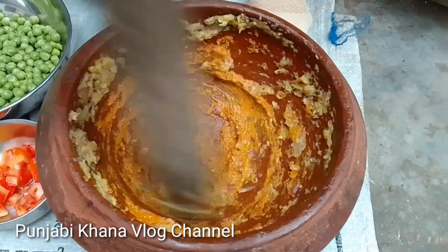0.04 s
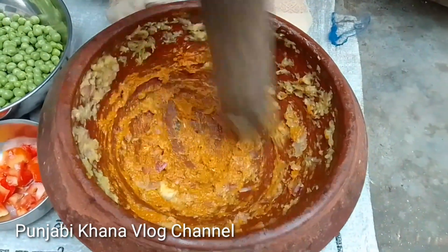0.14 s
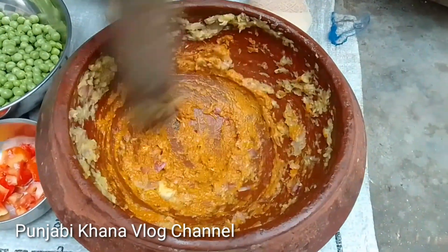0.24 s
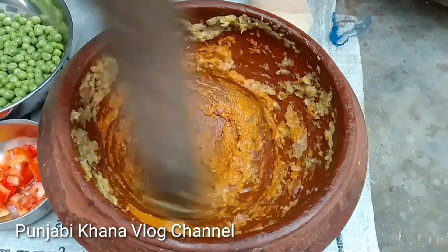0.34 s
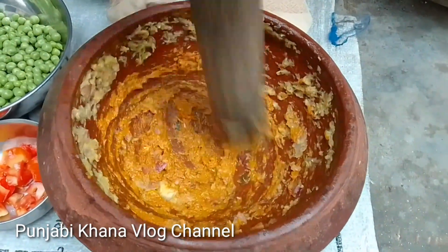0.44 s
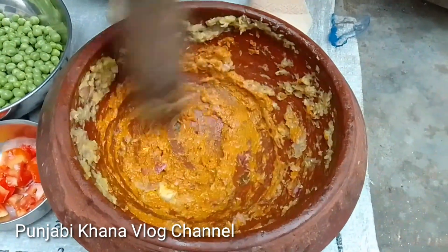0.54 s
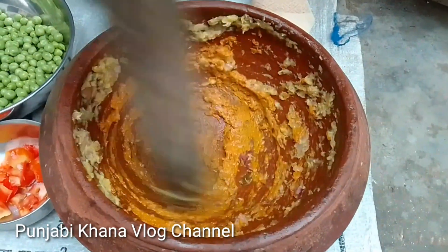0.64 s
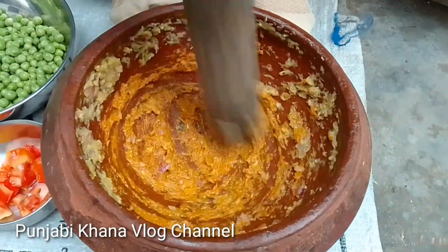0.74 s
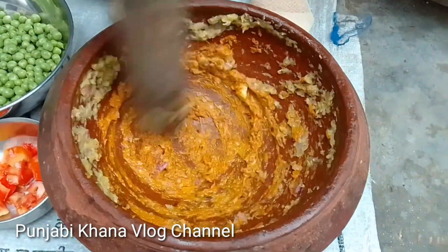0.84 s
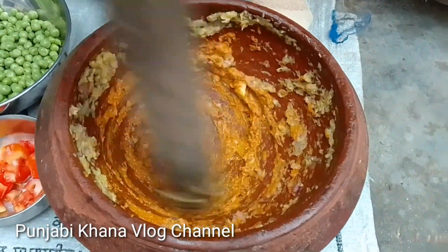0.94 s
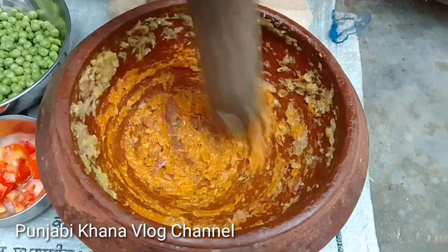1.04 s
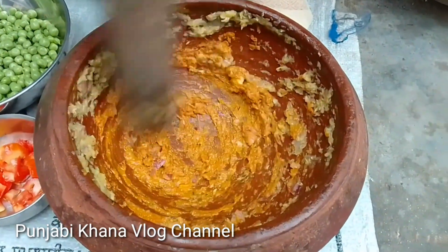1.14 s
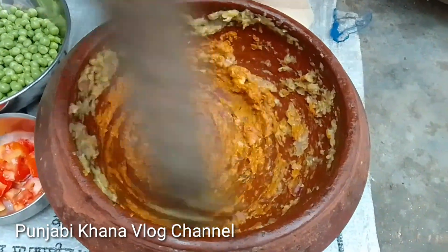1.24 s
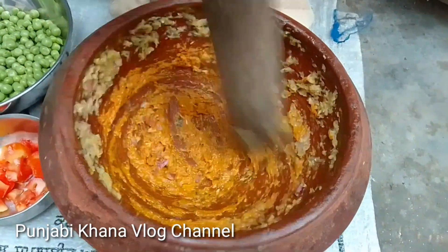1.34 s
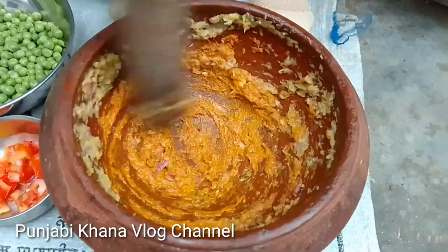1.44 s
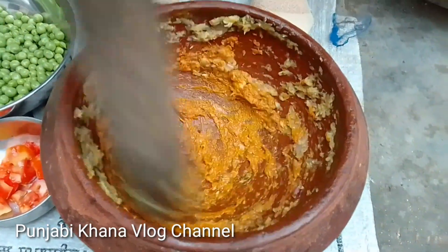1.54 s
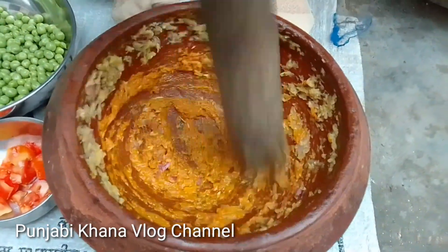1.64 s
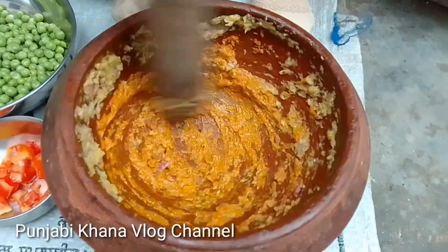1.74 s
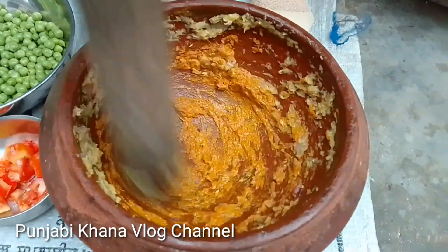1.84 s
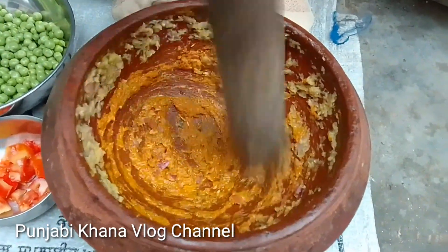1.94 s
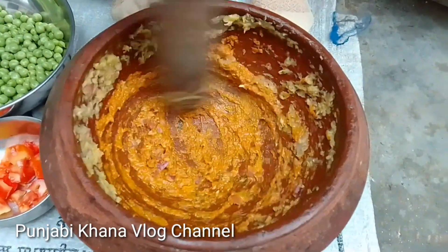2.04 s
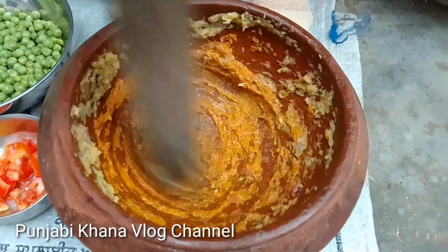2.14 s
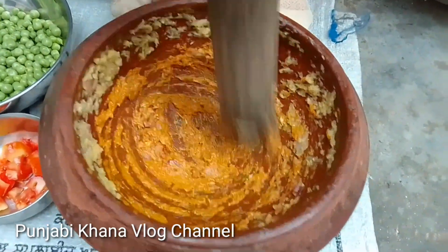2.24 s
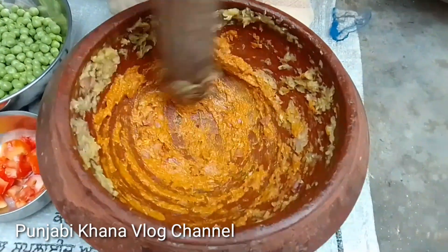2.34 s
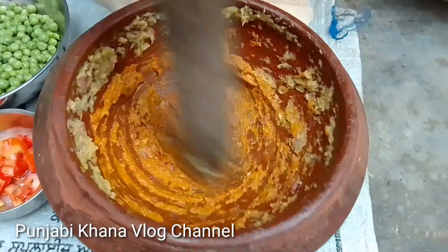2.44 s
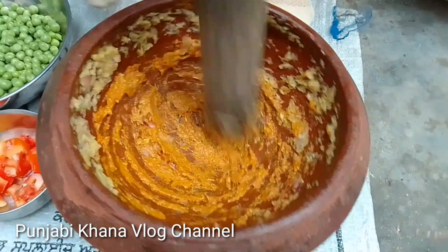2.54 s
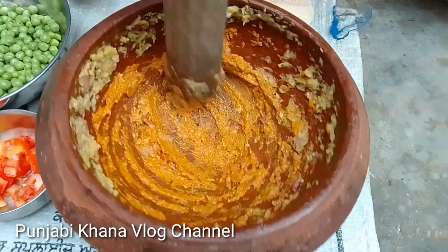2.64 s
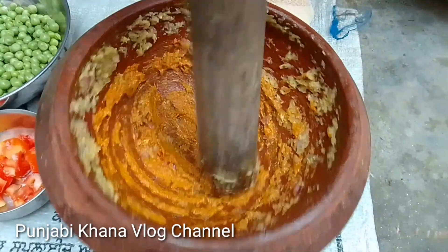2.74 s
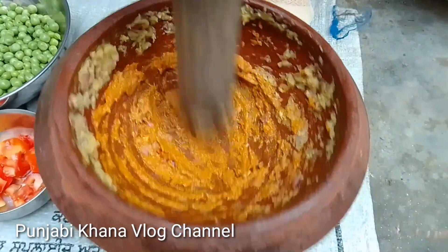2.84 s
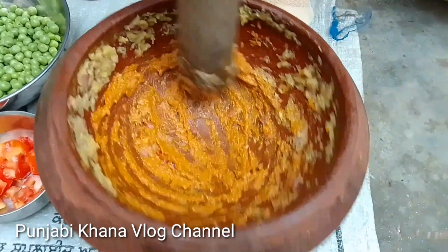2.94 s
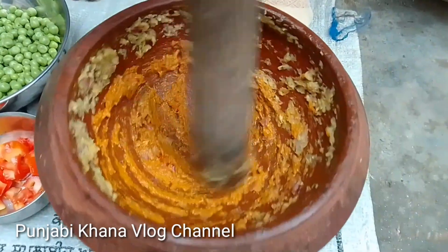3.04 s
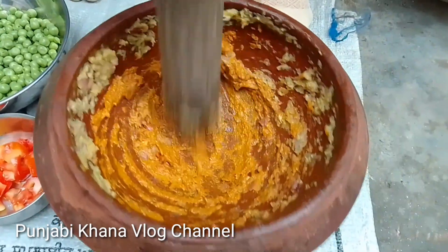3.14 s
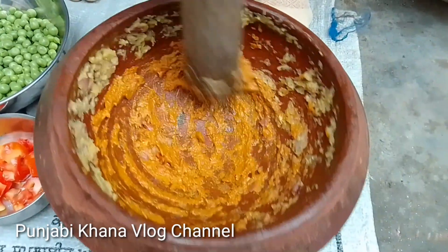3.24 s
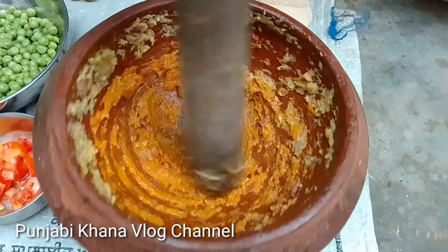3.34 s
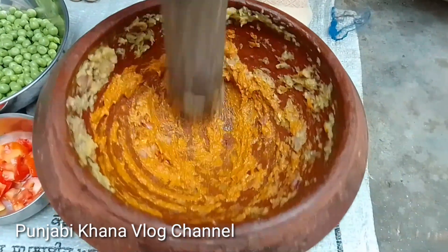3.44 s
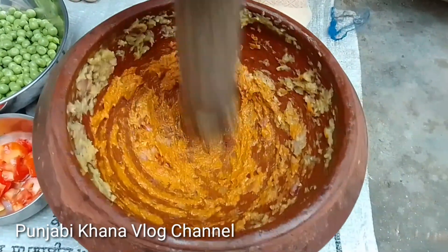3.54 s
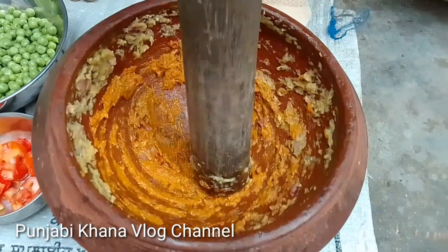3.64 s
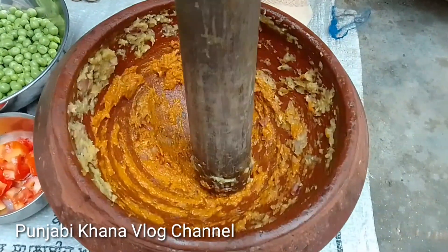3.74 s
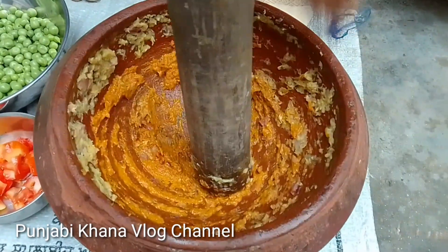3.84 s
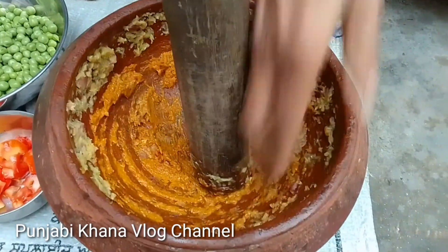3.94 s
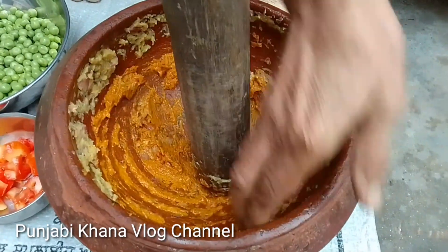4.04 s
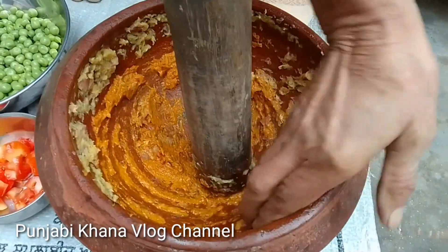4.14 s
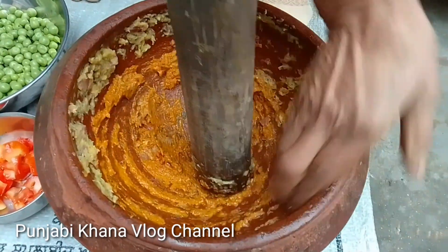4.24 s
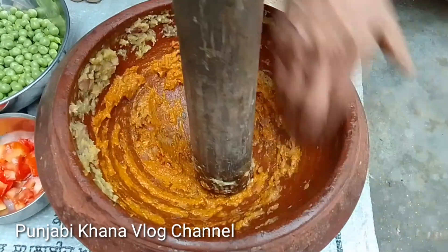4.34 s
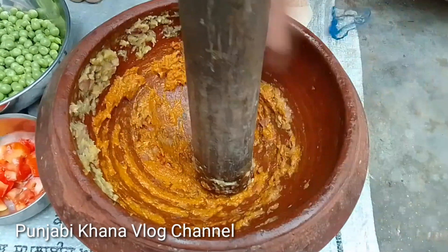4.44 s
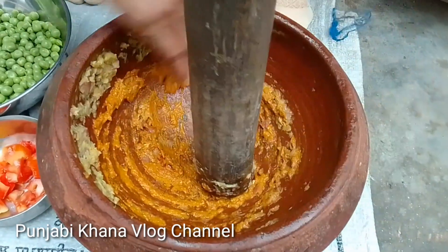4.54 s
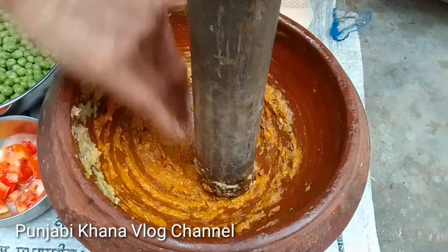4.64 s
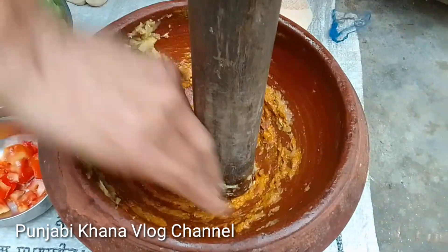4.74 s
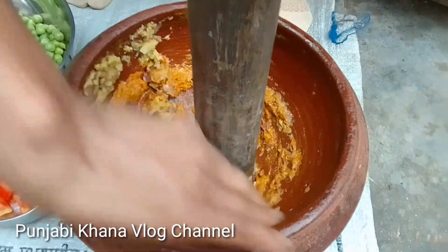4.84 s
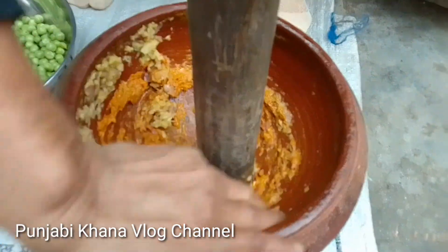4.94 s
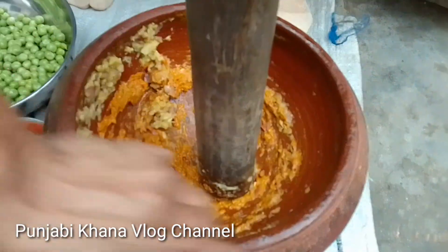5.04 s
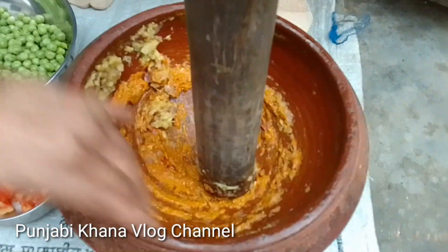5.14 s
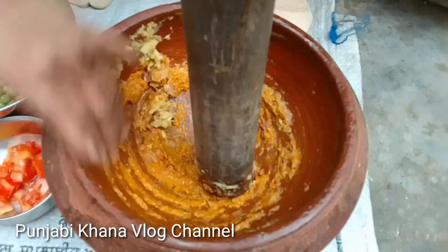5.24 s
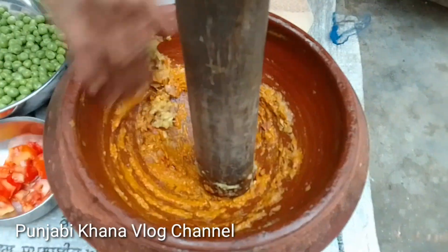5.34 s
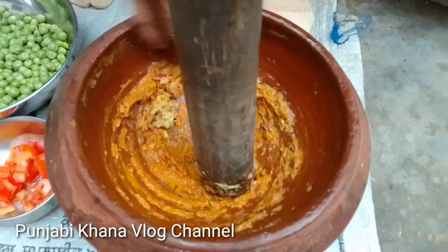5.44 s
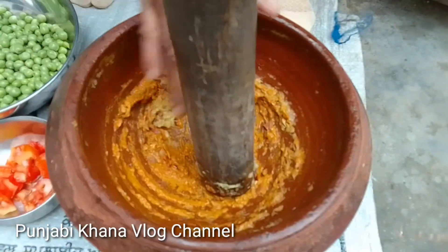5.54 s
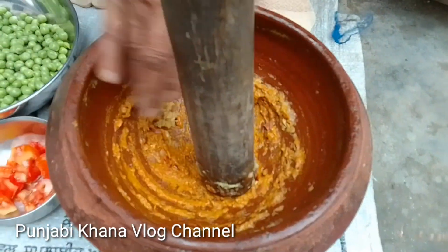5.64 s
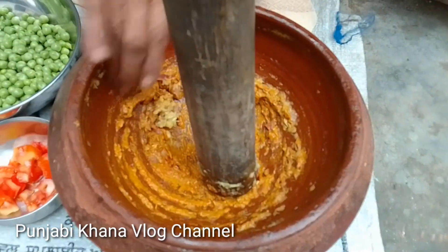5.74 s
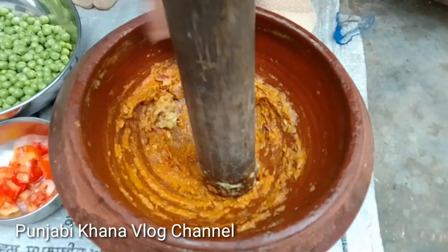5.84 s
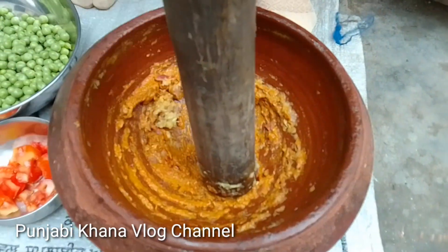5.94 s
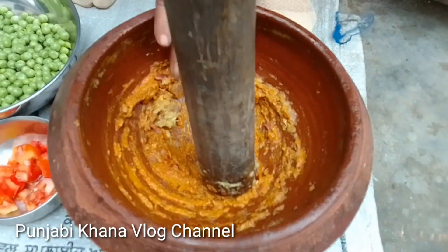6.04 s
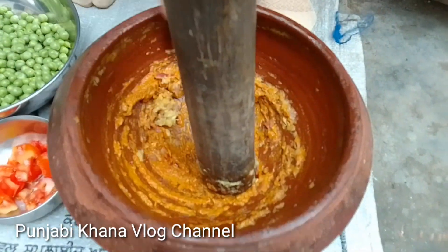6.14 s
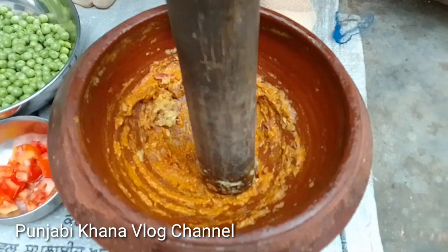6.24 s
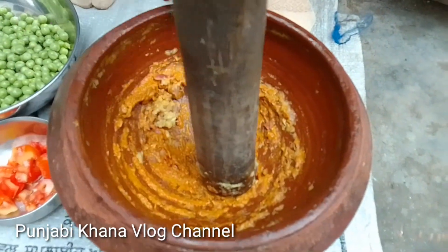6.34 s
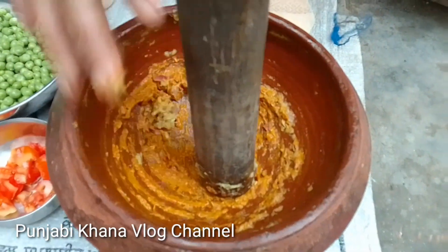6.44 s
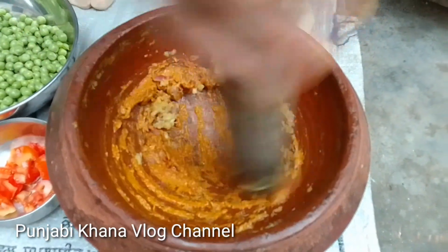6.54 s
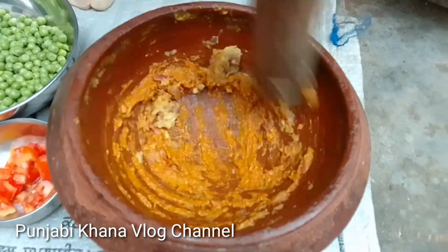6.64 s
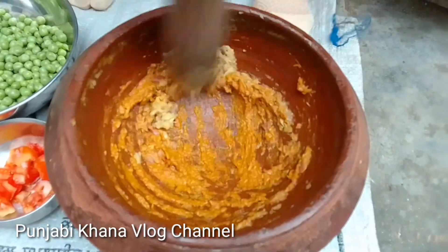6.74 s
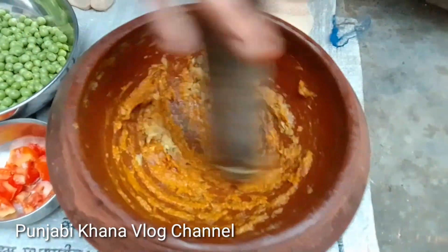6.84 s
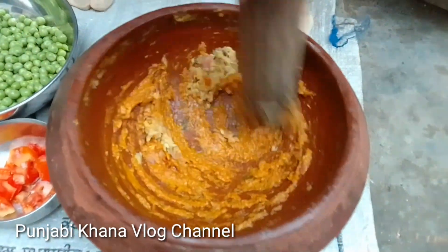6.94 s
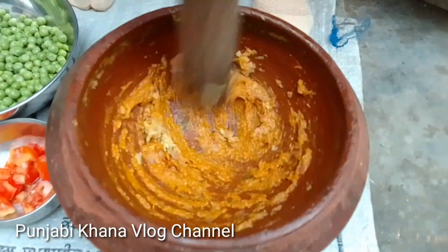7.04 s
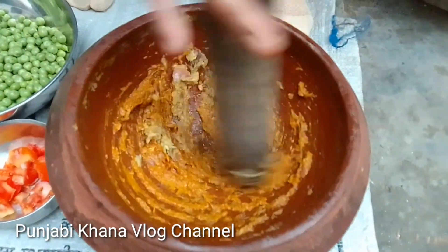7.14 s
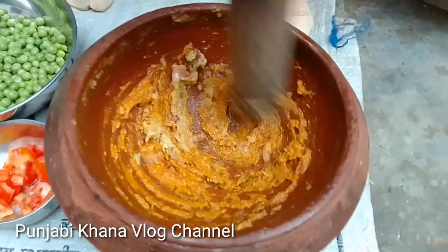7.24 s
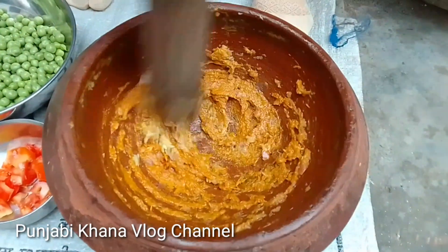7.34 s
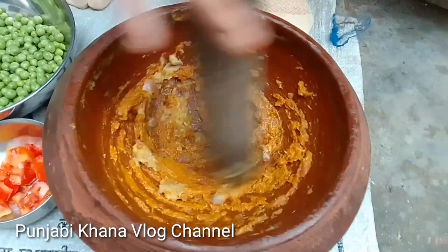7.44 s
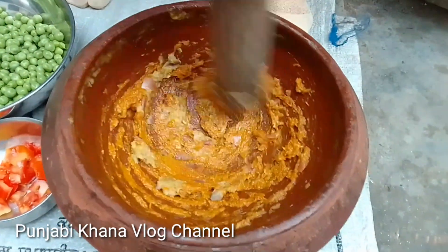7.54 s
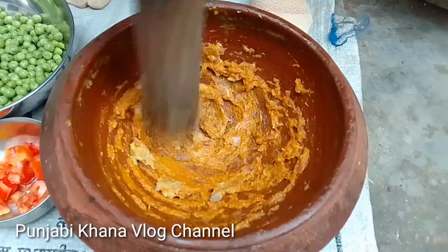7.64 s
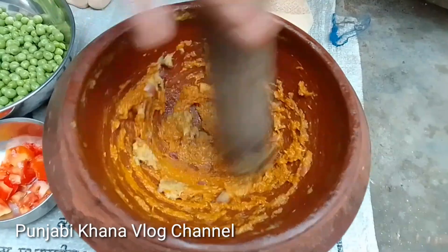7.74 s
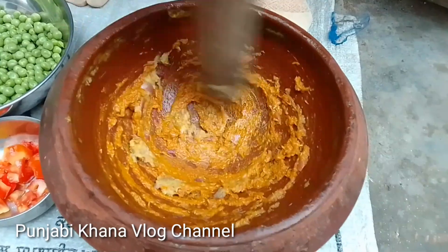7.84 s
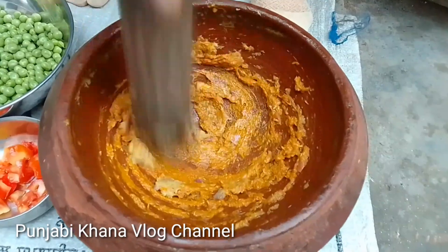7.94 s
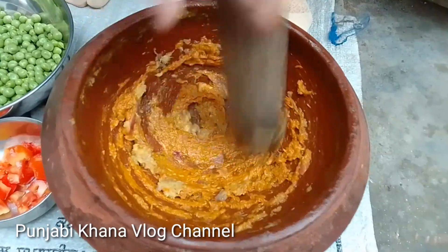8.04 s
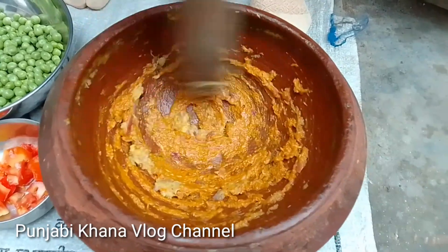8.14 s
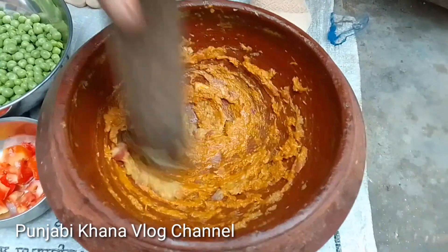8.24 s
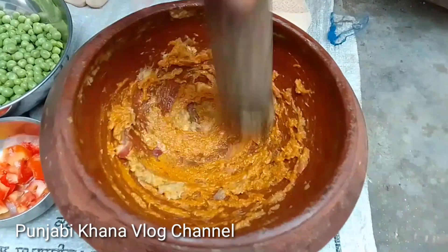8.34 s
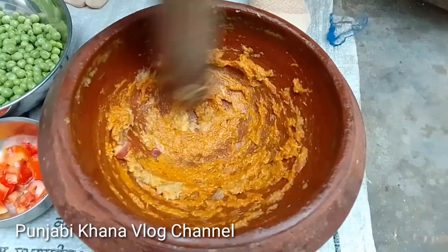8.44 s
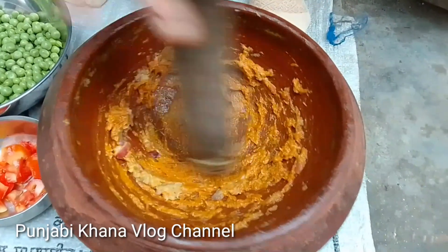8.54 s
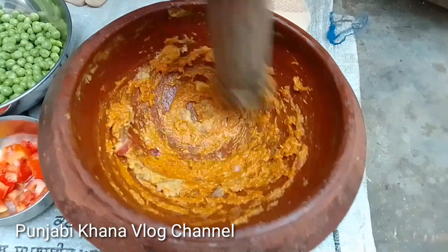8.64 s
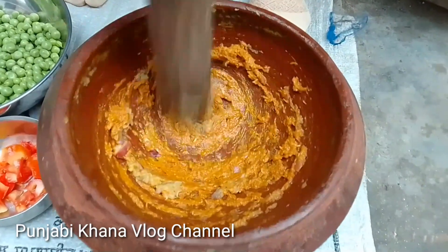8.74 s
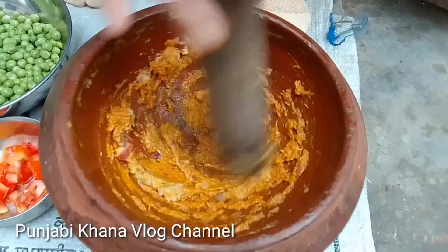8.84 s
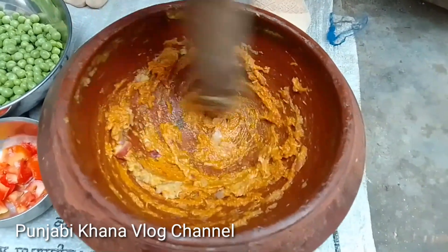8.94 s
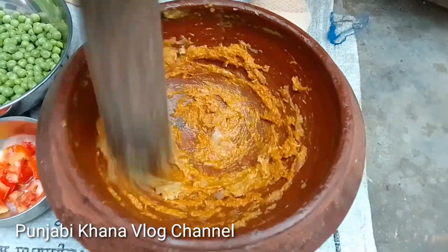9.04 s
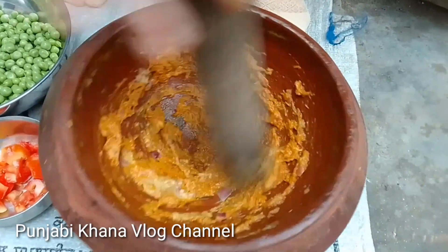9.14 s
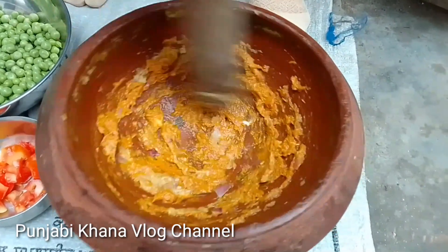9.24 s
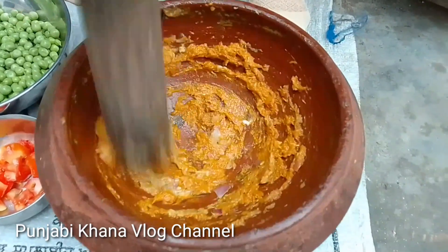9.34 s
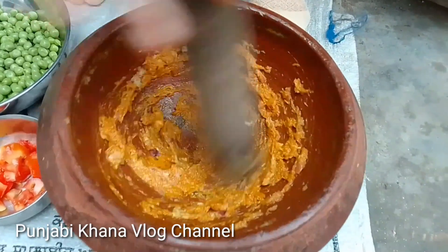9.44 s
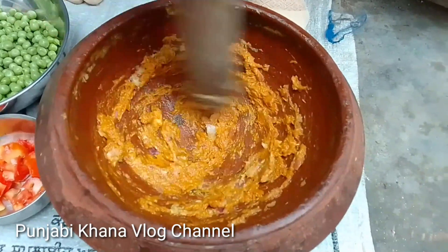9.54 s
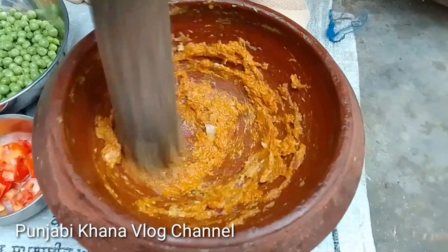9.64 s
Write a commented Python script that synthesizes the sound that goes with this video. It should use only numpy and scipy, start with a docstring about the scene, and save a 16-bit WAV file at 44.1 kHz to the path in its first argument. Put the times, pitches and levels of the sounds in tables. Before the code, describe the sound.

Close to the microphone, a wooden pestle drags through wet, gritty spice paste in a clay mortar, with irregular dull knocks, sharp snaps and tiny wet squeaks. It stops, and a hand softly wipes and taps the clay wall, hissing faintly. Then the grinding returns with harder knocks and continues to the end. A quiet, low rush of kitchen air stays underneath.

```python
"""A wooden pestle drags and knocks through wet, gritty spice paste in a clay mortar for 3.7 seconds.
It settles softly, then a hand wipes and taps the wall: skin hisses and the clay faintly sings.
From about 6.6 seconds the pestle is back until the end. Its uneven contact shakes wood, clay and paste,
blows thud and ring, and the mix snaps. Filtered noise makes the quiet rush of a kitchen throughout."""
import sys
import numpy as np
from scipy import signal
from scipy.io import wavfile
from scipy.ndimage import uniform_filter1d

SR = 44100
rng = np.random.default_rng(int(sys.argv[2]) if len(sys.argv) > 2 else 0)


def wav_out(sig):
    """Save sig, one row per channel (or a flat mono array), as 16-bit PCM at SR to the path in sys.argv[1]."""
    wavfile.write(sys.argv[1], SR, np.round(np.clip(np.atleast_2d(sig).T, -1, 1) * 32767).astype(np.int16))


N = 427324

# Low rush of air in the kitchen. Each row: frequency in Hz, relative level in dB per Hz.
AIR_SPECTRUM = [(25, -5), (70, -12.5), (140, 2.5), (300, -3), (520, -10.5), (950, -31), (2800, -35.5),
                (16000, -42.5)]
# Higher band of kitchen noise that comes and goes. Each row: time in seconds, level in dB.
MURMUR_LEVEL = [(3.8, -63.5), (4.25, -75), (4.5, -65), (5.2, -70), (5.7, -83), (6.1, -99.5), (6.25, -63),
                (6.7, -76)]
# Soft rubs on clay: the pestle settling first, then strokes of the hand along the wall.
# Each row: start in seconds, length in seconds, base level in dB, rise in dB per second,
# clay in dB above the base, hiss outside 5.9-9.5 kHz in dB above the base, pitch that sings in Hz.
SOFT_RUBS = [(3.764, 0.18, -75, 449, 7.5, 11.5, 2840), (4.028, 0.083, -75, 450, -5.5, 7, 2840),
             (4.395, .26, -52, 222, -4, 4, 1700), (4.66, 0.15, -61.5, 455, -14, -3, 1700),
             (4.783, 0.15, -61, 601, -9, 4, 1700), (5.096, 0.18, -71, 202, -8, 3.5, 990),
             (5.257, 0.3, -52, 453, -13, -11.5, 2162), (5.678, 0.24, -93.5, 201, 16, -3, 1300),
             (5.86, 0.14, -75.5, 200, 2.5, 3.5, 990), (6.176, 0.072, -65, 900.5, -11, 4, 990),
             (6.22, 0.19, -61.5, 252.5, -14, 1.5, 2162)]
# Hiss of skin on damp clay. Each row: frequency in Hz, relative level in dB per Hz.
SKIN_SPECTRUM = [(1760, -94), (3000, -16.5), (3810, -2.5), (4350, -6.5), (8520, 10), (9730, -3),
                 (12400, -4), (15100, -11), (16000, 1.5)]
# Resonances of the thin clay near the lip. Each row: pitch in Hz, width in Hz, relative level in dB.
WALL_MODES = [(990, 73, 0.5), (1300, 69, 6), (1200, 620, -6), (1700, 166, -4.5), (2162, 72, -2.5),
              (2840, 73, -23), (3380, 82, -12.5)]
# A finger taps the wall. Each row: time in seconds, level in dB.
FINGER_TAPS = [(4.782, -42), (5.793, -56.5), (6.155, -55)]
# Grit cracks or paste smacks. Each row: time in seconds, peak level in dB.
SNAP_TIMES = [(0.5276, -15.5), (1.159, -15), (1.4437, -11), (1.48, -19.5), (1.738, -16.5), (1.7723, -12.5),
              (2.0386, -14), (2.2896, -14.5), (2.3556, -13.5), (2.514, -18), (2.787, -16), (2.816, -19),
              (2.8312, -14), (2.9184, -15.5), (3.48, -21), (6.902, -13.5), (7.7408, -19), (7.783, -12.5),
              (7.8912, -16), (8.0726, -14.5), (8.121, -15), (8.212, -23), (8.402, -13.5), (8.6085, -16),
              (9.257, -14.5), (9.38, -17), (9.656, -15)]
# Fizz of the paste. Each row: frequency in Hz, relative level in dB per Hz.
FIZZ_SPECTRUM = [(2710, -17.5), (4600, -6.5), (4870, -8.5), (8420, -2), (9800, -8.5), (12200, -9),
                 (14900, -16), (16000, -11.5)]
# Resonances of the wooden pestle. Each row: pitch in Hz, width in Hz, relative level in dB.
PESTLE_MODES = [(148, 39, -10), (227, 47, 6), (330, 77, -4), (527, 130, 3.5), (578, 110, 7),
                (790, 110, -11)]
# Resonances of the clay bowl. Each row: pitch in Hz, width in Hz, relative level in dB.
MORTAR_MODES = [(935, 29, 3), (1091.6, 92, 3.5), (1201, 170, 0), (1460, 170, -11.5), (1696, 99, 6.5),
                (1920, 640, -11.5), (2183, 59, -2.5), (2364, 118, -3)]
# Higher resonances of the rim. Each row: pitch in Hz, width in Hz, relative level in dB.
RIM_MODES = [(3184, 280, 0), (3750, 240, -6.5), (3890, 170, 2), (4453, 260, -3.5), (6520, 680, -3)]
# Strokes of the pestle through the paste. Each row: start in seconds, length in seconds,
# scrape of wood on clay in dB and fizz of paste in dB, both before the layers are mixed.
PESTLE_STROKES = [(0.0, 0.1, -29.5, -31), (0.163, 0.277, -30, -30.5), (0.495, 0.042, -33, -30.5),
                  (0.565, 0.17, -33.5, -30.5), (0.805, 0.32, -34, -31), (1.146, 0.2, -32, -32.5),
                  (1.422, .11, -29, -30), (1.553, 0.14, -35, -38.5), (1.758, 0.12, -29.5, -31.5),
                  (1.93, 0.29, -32, -32), (2.237, 0.23, -31.5, -32), (2.521, 0.036, -29, -28.5),
                  (2.625, 0.096, -36, -37), (2.812, 0.014, -28, -27), (2.931, 0.035, -27.5, -29),
                  (3.074, 0.013, -35, -33.5), (3.124, 0.0087, -28, -26), (3.226, 0.048, -30, -32),
                  (3.387, 0.049, -34.5, -29.5), (3.507, 0.027, -26.5, -30), (3.652, 0.018, -28, -28),
                  (6.664, 0.069, -33, -32.5), (6.803, 0.045, -37.5, -41), (6.862, 0.11, -30.5, -33),
                  (7.003, 0.13, -41, -38.5), (7.189, 0.021, -32, -26), (7.284, 0.22, -36.5, -35.5),
                  (7.482, 0.225, -33.5, -34), (7.75, 0.024, -44, -35), (7.77, 0.028, -27.5, -33.5),
                  (7.831, .19, -34.5, -34.5), (8.066, 0.13, -34.5, -35.5), (8.232, 0.1, -32, -34.5),
                  (8.382, 0.048, -31, -29), (8.498, .25, -33.5, -34), (8.839, 0.075, -33, -32),
                  (8.96, 0.093, -35.5, -33.5), (9.099, 0.028, -29, -28.5), (9.236, 0.081, -36.5, -31.5),
                  (9.375, 0.066, -32, -31), (9.518, 0.093, -35, -31.5), (9.673, .03, -36, -33.5)]
# The tip catches on grit and lets go. Each row: time in seconds, scrape in dB before mixing.
TIP_SKIDS = [(0.569, -23), (0.928, -46), (1.192, -29), (1.778, -24), (2.377, -29), (2.664, -29.5),
             (2.965, -33), (6.636, -38), (6.952, -29), (7.525, -37)]
# The pestle meets clay. Each row: time in seconds, peak level of the thud in dB.
KNOCK_TIMES = [(0.1603, -19), (0.238, -16.5), (0.508, -17), (0.8171, -14.5), (1.115, -23.5),
               (1.3688, -22.5), (1.41, -20), (1.442, -25), (1.4504, -16.5), (1.4645, -19), (1.4803, -23),
               (1.7448, -21), (1.7777, -23), (2.066, -19), (2.2671, -12), (2.279, -12), (2.528, -13),
               (2.546, -11.5), (2.557, -16), (2.818, -7.5), (2.9272, -22.5), (3.1087, -16.5), (3.1169, -9),
               (3.1255, -9.5), (3.1334, -14.5), (3.143, -21), (3.2173, -20.5), (3.398, -14.5),
               (3.4056, -12.5), (3.422, -21), (3.4957, -15), (3.6593, -24), (3.679, -17), (3.6874, -16.5),
               (6.904, -8.5), (6.9198, -11.5), (6.934, -18), (7.19, -19.5), (7.2107, -19), (7.2186, -7),
               (7.503, -26), (7.7814, -15.5), (8.0709, -6.5), (8.0899, -22), (8.1196, -5.5), (8.1604, -19),
               (8.385, -14), (8.399, -11), (8.613, -11.5), (8.623, -15), (8.629, -14.5), (8.654, -12.5),
               (8.8775, -12), (8.8964, -13), (8.9042, -6.5), (9.095, -23), (9.26, -21.5), (9.2818, -20),
               (9.527, -11.5), (9.5598, -24.5)]

KITCHEN_DB = -63
SONG_DB = 11  # lift of the wall resonances near the pitch that sings
RUB_SAG_DB_PER_S, RUB_FALL_DB_PER_S = 9.5, 352
STROKE_RISE_DB_PER_S, STROKE_SAG_DB_PER_S, STROKE_FALL_DB_PER_S = 405.5, 4.5, 302
SKID_RISE_DB_PER_S, SKID_FALL_DB_PER_S = 3002, 350.5
SKID_FIZZ_DB = -10.5  # fizz of a skid compared with its scrape
DRIFT, DRIFT_S = 0.012, 0.046  # small random wander of the clay pitches: share, smoothing time
THUD_HZ, THUD_SPREAD = 555.4, .11  # pitch of the thud and its share of change from blow to blow
EDGE_HZ = 15600  # upper band limit


def gain_of(db):
    """Turns decibels into a factor on the wave."""
    return 10 ** (np.asarray(db) / 20)


def evened(x):
    """Brings a signal to an average (RMS) level of 1."""
    return x / np.sqrt(np.mean(x ** 2) + 1e-20)


def coloured(x, points):
    """Filters by a spectrum, with minimum phase so that clicks keep their sharp start."""
    hz, db = np.transpose(points)
    grid = np.fft.rfftfreq(8192, 1 / SR)
    half = np.interp(np.log(grid + 1), np.log(hz + 1), db) * np.log(10) / 20  # dB to natural log
    full = signal.hilbert(np.r_[half, half[-2:0:-1]])
    response = np.fft.ifft(np.exp(full.conj())).real[:4096]
    return signal.oaconvolve(x, response)[:len(x)]


def ring(x, modes):
    """A sum of resonances of alternating sign, each applied twice so that the valleys stay dark."""
    out = 0
    for k, (hz, width, db) in enumerate(modes):
        peak = signal.iirpeak(hz, hz / (1.5 * width), SR)  # two passes narrow it again
        rung = signal.lfilter(*peak, signal.lfilter(*peak, x))
        out = out + (-1) ** k * gain_of(db) * rung
    return out


def wander(seconds):
    """A slow random curve: noise smoothed twice over the given time."""
    window = round(seconds * SR)
    return evened(uniform_filter1d(uniform_filter1d(rng.standard_normal(N), window), window))


def friction(grains_per_s, spread_db, grit_db):
    """Smooth rubbing noise plus grains of very unequal size."""
    size = gain_of(spread_db * np.minimum(rng.exponential(1, N), 4)) * rng.choice([-1., 1.], N)
    smooth = rng.standard_normal(N)
    grains = evened(size * (rng.random(N) < grains_per_s / SR))
    return evened(smooth + gain_of(grit_db) * grains)


def patchy(x, depth_db, frames, bins):
    """The point of contact moves, so patches of the spectrum swell and fade on their own."""
    z = signal.stft(x, nperseg=256, noverlap=192)[2]
    field = uniform_filter1d(rng.standard_normal(z.shape[::-1]), frames, 0)  # smooth in time
    field = uniform_filter1d(field, bins, 1)  # and across pitch
    gain = gain_of(depth_db * evened(field)).T
    return evened(signal.istft(z * gain, nperseg=256, noverlap=192)[1][:N])


def gesture(t, start, length, db, rise, sag, fall):
    """Level in dB of one movement: it rises to the start, sags while it lasts, then falls."""
    before = np.maximum(start - t, 0)
    during = np.clip(t - start, 0, length)
    after = np.maximum(t - start - length, 0)
    return db - rise * before - sag * during - fall * after


def kitchen():
    """A low, gently swelling rush of air, with a higher band of noise that comes and goes."""
    air_level = gain_of(KITCHEN_DB + 1.2 * wander(0.054))
    air = air_level * evened(coloured(rng.standard_normal(N), AIR_SPECTRUM))
    murmur = ring(rng.standard_normal(N), [(509, 210, 0.0063), (745, 120, 0.0078)])
    seconds, db = np.transpose(MURMUR_LEVEL)
    murmur_db = np.interp(np.arange(N) / SR, seconds, db, -150, -150)  # silent outside the table
    return air + gain_of(murmur_db) * evened(murmur)


def walls(x):
    """Sparse, dulled echoes of random sign that die away."""
    t = np.arange(SR // 2) / SR
    signs = rng.choice([-1., 1.], len(t))
    chosen = (rng.random(len(t)) < .05) * (t > .004)
    echoes = signs * chosen * gain_of(-60 * t / 0.22)  # 60 dB down after 0.22 s
    echoes = signal.lfilter([1], [1, -.5], echoes)  # dulls all echoes alike
    return signal.oaconvolve(x, echoes / np.linalg.norm(echoes))[:N]


def wiping():
    """Soft rubs on the damp clay: a smooth hiss, and the clay sings faintly near one pitch."""
    touch = friction(280, 1.3, -0.99)
    skin = patchy(coloured(touch, SKIN_SPECTRUM), 2.5, frames=90, bins=1)
    band = signal.butter(3, [5900, 9500], "bandpass", fs=SR, output="sos")
    core = signal.sosfiltfilt(band, skin)
    out, rub = np.zeros(N), gain_of(1.4 * wander(0.022))
    for start, length, base_db, rise, clay_db, wide_db, song_hz in SOFT_RUBS:
        at = np.arange(round((start - .2) * SR), round((start + length + .2) * SR))
        modes = [(hz, width, db + SONG_DB * (abs(hz / song_hz - 1) < .09))
                 for hz, width, db in WALL_MODES]
        level = gain_of(gesture(at / SR, start, length, base_db, rise,
                                RUB_SAG_DB_PER_S, RUB_FALL_DB_PER_S))
        hiss = core[at] + gain_of(wide_db) * (skin - core)[at]
        clay = gain_of(clay_db) * evened(ring((touch * rub)[at], modes))
        out[at] += level * (hiss + clay)
    return out


def taps():
    """Each tap is a dull pat, a tick and a short ring of the wall."""
    out, t = np.zeros(N), np.arange(3000) / SR
    for (s, db), noise in zip(FINGER_TAPS, rng.standard_normal((len(FINGER_TAPS), len(t)))):
        tick = gain_of(db) * noise * np.exp(-t / 0.002)
        wall = gain_of(10) * ring(tick, WALL_MODES)
        pat = gain_of(13.5) * ring(tick, [(540, 660, 0)])
        out[round(s * SR):][:len(t)] += tick + wall + pat
    return out


def snaps():
    """Each snap is a sharp tick and a few milliseconds of crackle."""
    out, t = np.zeros(N + 600), np.arange(600) / SR
    for (s, db), noise in zip(SNAP_TIMES, rng.standard_normal((len(SNAP_TIMES), 600))):
        fade = np.exp(-t / 0.00022) + 0.74 * np.exp(-t / 0.0027)
        snap = coloured(noise * fade, FIZZ_SPECTRUM)
        out[round(s * SR):][:600] += gain_of(db) * snap / abs(snap).max()
    return out[:N]


def squeaks(per_s):
    """Brief wet squeaks: short gliding chirps of many random pitches."""
    out = np.zeros(N)
    for hz, glide, cycles in rng.uniform([3000, -.12, 15], [11000, .12, 70], (24, 3)):
        u = np.linspace(0, 1, round(cycles / hz * SR))  # progress through the chirp
        chirp = np.sin(np.pi * u ** 0.42) * np.sin(2 * np.pi * cycles * u * (1 + glide * u))
        at = rng.integers(0, N - len(u), round(per_s * N / SR / 24))
        for i, db in zip(at, 4 * rng.standard_normal(len(at))):
            out[i:i + len(u)] += gain_of(db) * chirp
    return evened(out)


def slips(per_s, hold_s):
    """The tip breaks loose at once, then grips again slowly."""
    kicks = rng.exponential(1, N) * (rng.random(N) < per_s / SR)
    level = signal.lfilter([1], [1, -np.exp(-1 / (hold_s * SR))], kicks)
    level = uniform_filter1d(level, 40)
    return evened(level - level.mean())


def drifting(x, modes):
    """Resonances with a slight random wander in pitch: shift down, smooth twice, shift back."""
    out, bend = 0, 1 + DRIFT * wander(DRIFT_S)
    for k, (hz, width, db) in enumerate(modes):
        own_bend = np.roll(bend, k * SR)  # each mode starts elsewhere on the curve
        turn = np.exp(2j * np.pi * hz / SR * np.cumsum(own_bend))
        r = np.exp(-1.5 * np.pi * width / SR)
        smooth = signal.lfilter([(1 - r) ** 2], [1, -2 * r, r * r], x * turn.conj())
        out = out + (-1) ** k * gain_of(db) * (turn * smooth).real
    return out


def scraping():
    """Levels of scrape and fizz; the strokes overlap where one fades and the next begins."""
    t = np.arange(0, N, 32) / SR
    start, length, *levels = np.array(PESTLE_STROKES).T[:, :, None]
    shape = gain_of(gesture(t, start, length, 0,
                            STROKE_RISE_DB_PER_S, STROKE_SAG_DB_PER_S, STROKE_FALL_DB_PER_S))
    skid_s, skid_db = np.array(TIP_SKIDS).T[:, :, None]
    skids = gain_of(gesture(t, skid_s, 0, skid_db, SKID_RISE_DB_PER_S, 0, SKID_FALL_DB_PER_S))
    out = []
    for db, share_db in zip(levels, [0, SKID_FIZZ_DB]):
        rows = np.r_[gain_of(db) * shape, gain_of(share_db) * skids]
        total = np.linalg.norm(rows, axis=0)  # add as powers
        out.append(np.interp(np.arange(N) / SR, t, total))
    return out


def grinding():
    """The pestle sticks and slips; one uneven contact shakes wood, clay and paste."""
    scrape, fizz = scraping()
    slips_db = 2.3 * wander(0.0025) + 1.84 * slips(60, 0.017)
    contact = friction(900, 3.6, -7.0)
    wood = patchy(ring(contact * gain_of(0.92 * slips_db), PESTLE_MODES), 2.6, frames=40, bins=1)
    clay = patchy(drifting(contact * gain_of(1.24 * slips_db), MORTAR_MODES), 3.67, frames=55, bins=1)
    rim = patchy(ring(contact * gain_of(1.1 * slips_db), RIM_MODES), 4.2, frames=20, bins=2)
    # the paste has grains of its own but follows the same slips
    paste_level = gain_of(0.9 * slips_db + 1.7 * wander(0.0026))
    paste = coloured(friction(800, 4.1, -1.8) * paste_level, FIZZ_SPECTRUM)
    paste = patchy(paste, 3.4, frames=12, bins=4)
    hard = gain_of(-9.5) * wood + gain_of(-3.0) * clay + gain_of(-12.5) * rim
    wet = gain_of(-7.0) * paste + gain_of(-18.0) * squeaks(250)
    return scrape * hard + fizz * wet


def knocks():
    """A cushioned blow thuds and dies fast; a short rough burst, as the tip skids, rings wood and clay."""
    t = np.arange(900) / SR
    thuds = np.zeros(N + 900)
    blows = 1e-9 * rng.standard_normal(N + 900)  # starts from inaudible noise
    for (s, db), chance in zip(KNOCK_TIMES, rng.standard_normal((len(KNOCK_TIMES), 901))):
        hz = THUD_HZ * (1 + THUD_SPREAD * chance[0])
        swing = np.cos(2 * np.pi * hz * (t - .0025))
        thud = (t / .001) ** 2 * np.exp(-t / 0.00082) * swing  # swells over about a cycle
        burst = chance[1:] * t / 0.0013 * np.exp(-t / 0.0029)
        thuds[round(s * SR):][:900] += gain_of(db) * thud / abs(thud).max()
        blows[round(s * SR):][:900] += gain_of(db) * burst
    wood = gain_of(-1.5) * ring(blows[:N], PESTLE_MODES)
    clay = gain_of(-11.5) * ring(blows[:N], MORTAR_MODES)
    return thuds[:N] + wood + clay


def scene():
    """The close sounds, their faint echoes and the kitchen, as one channel."""
    near = grinding() + wiping() + taps() + knocks() + snaps()
    return (near + gain_of(-16.5) * walls(near) + kitchen())[None]


def record(dry):
    """The microphone rolls off the bass; then the band limit."""
    bass_cut = signal.butter(3, 115, "highpass", fs=SR, output="sos")
    thin = signal.sosfilt(bass_cut, dry)
    band_limit = signal.firwin(511, EDGE_HZ, window=("kaiser", 9), fs=SR)
    return signal.oaconvolve(thin, band_limit[None], "same")


dry = scene()
out = record(dry)
wav_out(out)
```